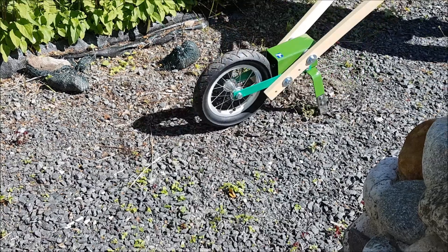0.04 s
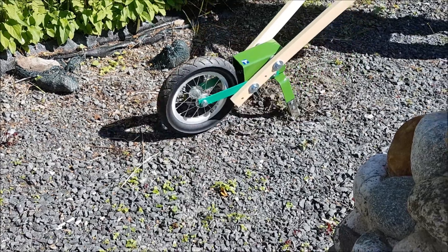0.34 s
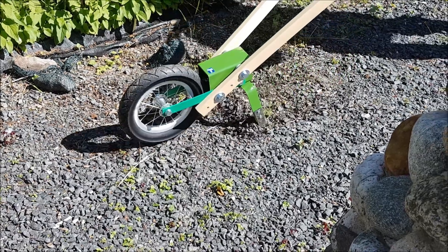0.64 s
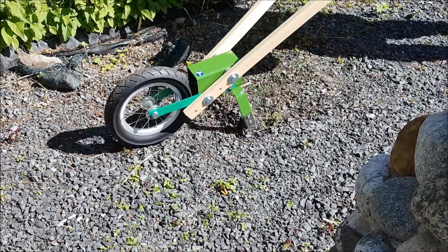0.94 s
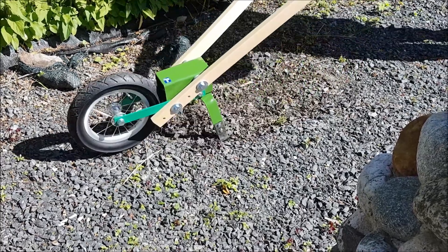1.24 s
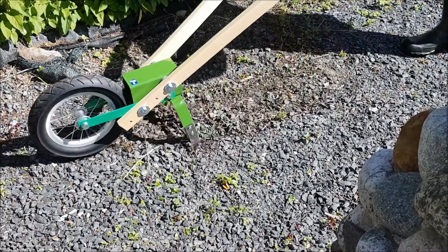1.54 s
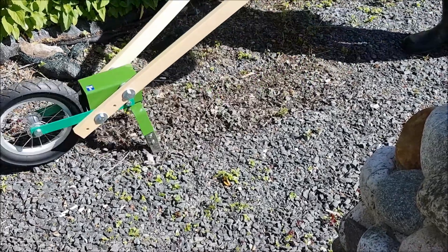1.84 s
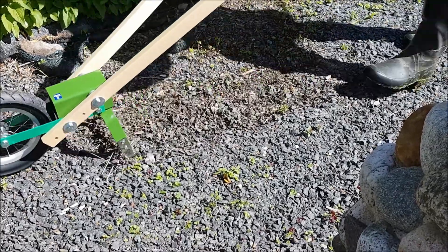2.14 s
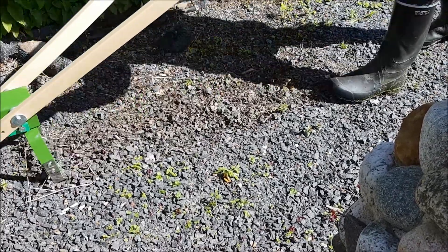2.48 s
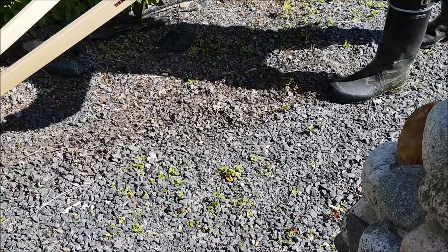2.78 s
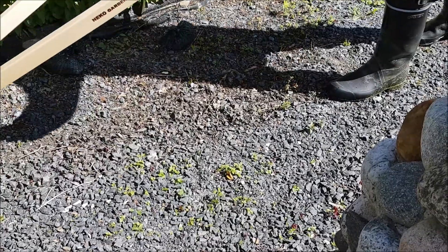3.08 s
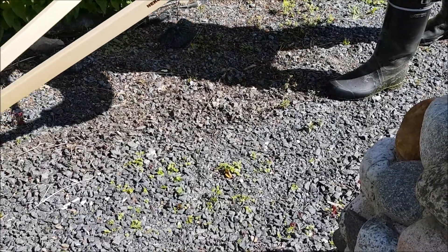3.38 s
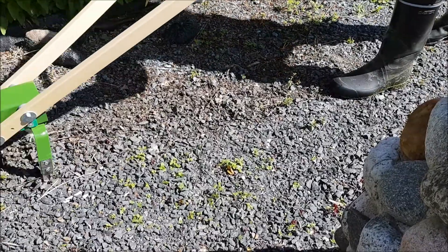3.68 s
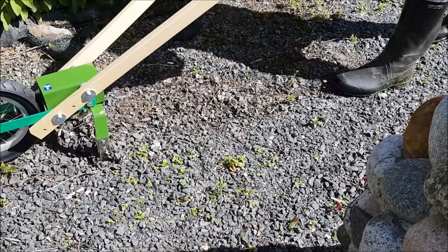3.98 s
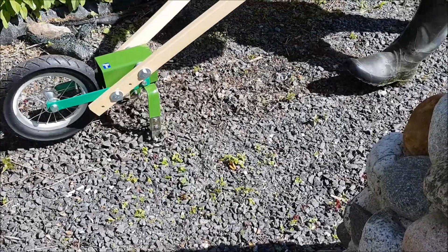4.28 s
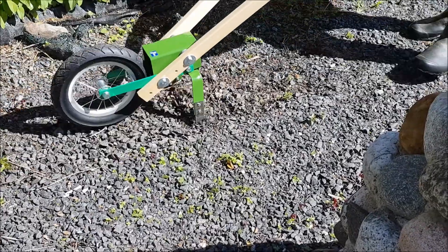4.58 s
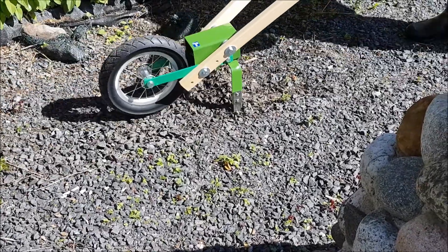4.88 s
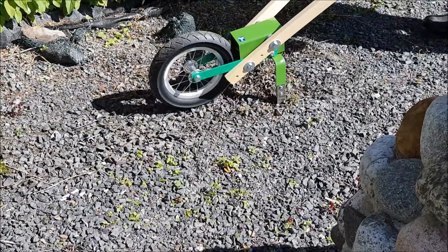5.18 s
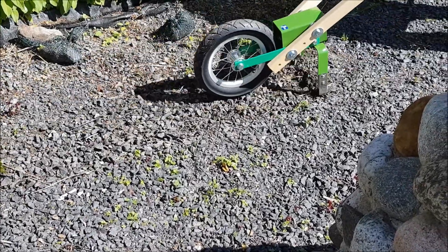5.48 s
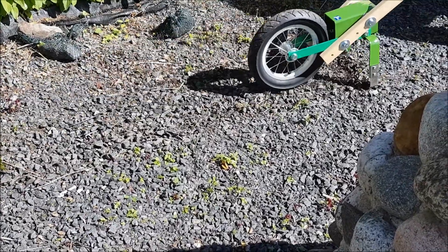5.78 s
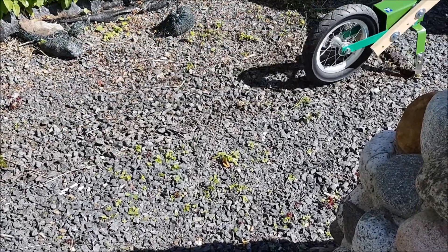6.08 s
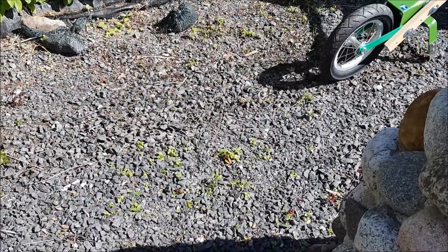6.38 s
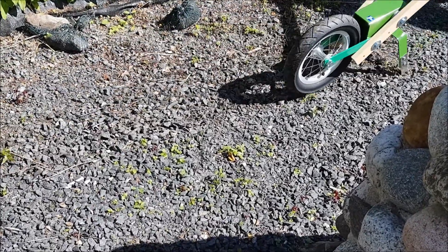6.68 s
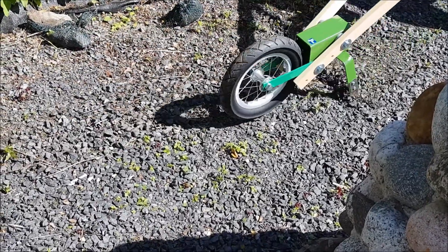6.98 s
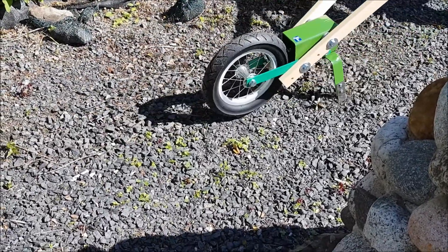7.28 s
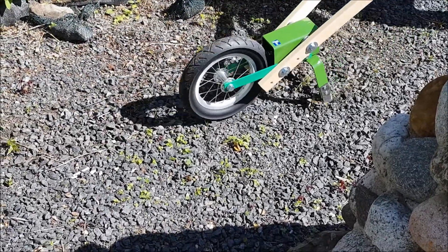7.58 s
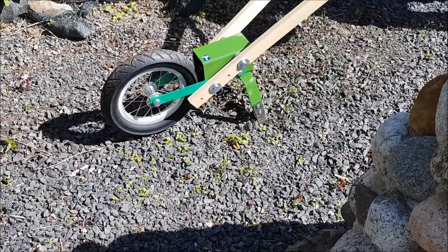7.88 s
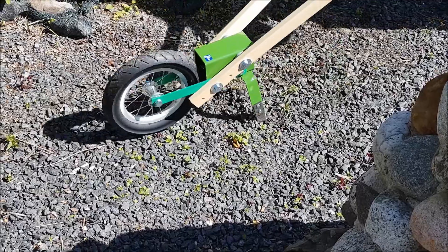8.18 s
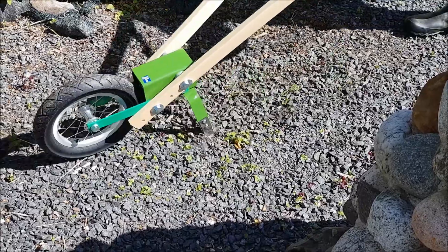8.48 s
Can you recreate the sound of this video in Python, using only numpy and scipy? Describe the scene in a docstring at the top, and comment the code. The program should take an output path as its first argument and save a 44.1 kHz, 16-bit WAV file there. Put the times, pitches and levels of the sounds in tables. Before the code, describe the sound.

Close outdoors, a steel hoe blade works back and forth through gravel, with gritty crunching, ringing stone clicks and dull knocks.

```python
"""A wheel hoe on a gravel path, outdoors, close to a stereo pair of microphones. It starts with short pushes,
as a faint hum fades and a bird chirps far off. Stones crunch together and strike the steel blade, which rings
through the frame; some jam and jump free, and the frame knocks dully. Then comes one long drag back, late in
which the tyre rubs with a low tone, brief squeals follow, and the blade skims loose pebbles. Near 6.6 s the hoe
turns round with a soft swish and is pushed again."""
import sys
import numpy as np
from scipy import signal
from scipy.fft import rfft, irfft, next_fast_len
from scipy.io import wavfile

SR = 44100
rng = np.random.default_rng(int(sys.argv[2]) if len(sys.argv) > 2 else 0)


def wav_out(sig):
    """Save sig, one row per channel (or a flat mono array), as 16-bit PCM at SR to the path in sys.argv[1]."""
    wavfile.write(sys.argv[1], SR, np.round(np.clip(np.atleast_2d(sig).T, -1, 1) * 32767).astype(np.int16))


N = 376613
T = np.arange(N) / SR


# Colour of the colliding stones, per third octave: f/Hz, level/dB (all table levels are relative)
STONE_SPECTRUM = [(80, -34), (170, -24.5), (300, -7), (550, -14), (1000, -6.5), (1700, -10), (2700, -7.5),
                  (4000, -2.5), (5500, -9), (7500, 0), (9500, -10), (13000, 3.5), (16000, -3.5)]

def gravel(clicks, drag, level_db, mix_db):
    """Stone on stone, close up: dry clicks that die within a few cycles, in an ever-changing mix of sizes."""
    out = 0
    for hz in np.geomspace(80, 15000, 24):
        strength = effort(drag, hz) * from_db(level_db + at_hz(STONE_SPECTRUM, hz) + mix_db * drift(45))
        out = out + third_octave(scatter(clicks * strength, hz), hz)
    return out


def collisions(per_s, size_db, clump_db):
    """Stone contacts, many small and a few large, in clumps as the gravel sticks and slips; unit power."""
    sizes = from_db(size_db * np.minimum(rng.exponential(1, N), 4))
    hits = rng.random(N) < per_s / SR
    return rms_one(hits * sizes * from_db(clump_db * drift(110)) / np.sqrt(per_s))


# Modes of blade, frame and wheel: f/Hz, width/Hz, level/dB
STEEL_MODES = [(290, 59, -7), (367, 27.5, 2), (433, 43, -2.5), (718, 47, -2), (919, 59, 1), (1092, 58, 0),
               (1130, 13, -21), (1458, 160, 1), (1656, 63, 0.5), (1848, 36, -10), (2254, 230, 3.5),
               (2325, 480, 2), (2570, 105, 1), (2755, 105, 0), (2900, 69, -8.5), (3026, 94, 1),
               (3343, 125, 3.5), (3600, 170, -14.5), (4210, 200, 0), (4425, 260, -2.5), (5060, 160, -8),
               (6700, 1100, 2), (7850, 430, 3), (11800, 350, -33), (12900, 290, -15), (15800, 300, -24)]

def hoe(clicks, drag, level_db, shift_db):
    """Stone on steel: as the contacts move along the blade, now one mode rings out and now another."""
    out = 0
    for hz, width, db in STEEL_MODES:
        strength = effort(drag, hz) * from_db(level_db + db + shift_db * drift(22))
        out = out + resonate(scatter(clicks * strength, hz), hz, width)
    return out


# The blade takes hold of the path: bite t/s, ease t/s, attack/s, release/s, bite level/dB, ease level/dB,
# weight on the frame against crunch/dB, fine grit against crunch/dB
BLADE_STROKES = [(0, 0.009, 0.0089, 0.071, -46, -44, 0, -8),
                 (0.356, 0.548, 0.0074, .1, -46, -54.5, -5, -6.5),
                 (0.605, 0.699, 0.086, 0.15, -39, -44.5, -5, -6),
                 (0.799, 0.898, .03, 0.097, -61, -64, 7.5, -3),
                 (1.048, 1.208, 0.056, 0.16, -43, -36.5, -2.5, -6.5),
                 (1.554, 1.69, 0.015, 0.12, -51, -39.5, -0.5, -7),
                 (1.796, 1.809, .1, 0.051, -32, -33.5, -17, -5),
                 (1.865, 1.923, .03, 0.12, -51, -49.5, -1, -2.5),
                 (2.141, 2.297, 0.081, 0.092, -46.5, -41, -5, -7.5),
                 (2.392, 2.989, 0.13, .06, -39.5, -37, -6, -3),
                 (3.023, 3.126, 0.027, .045, -38.5, -45.5, -8.5, -7.5),
                 (3.4, 3.64, 0.13, 0.17, -40, -40.5, -9.5, -6),
                 (3.75, 4.055, 0.12, 0.1, -42, -43.5, -4, -3),
                 (4.146, 4.203, .08, 0.077, -40, -39.5, -3, -1.5),
                 (4.276, 4.641, 0.14, 0.26, -44.5, -45, -4.5, -3),
                 (4.76, 5.246, 0.22, 0.19, -48.5, -43, -2.5, -5),
                 (5.535, 5.704, 0.2, 0.24, -46.5, -46, -3.5, -4.5),
                 (5.822, 6.09, .015, 0.28, -44, -48, -4.5, -1),
                 (6.294, 6.422, .05, .2, -62, -68.5, 0.5, -1),
                 (6.688, 6.846, 0.017, 0.057, -57, -58.5, 2, 2),
                 (6.896, 7.063, 0.14, .13, -40, -39.5, -4.5, -4),
                 (7.155, 7.21, 0.054, 0.1, -39, -37.5, -7, -7),
                 (7.639, 7.713, 0.069, 0.19, -48.5, -50, 1, -12.5),
                 (7.755, 7.966, 0.052, 0.16, -40, -39.5, -5, -3.5),
                 (8.39, 8.537, 0.057, .1, -38, -41, -2.5, -2)]
# The wheel alone: crunch level/dB, weight level/dB, grit level/dB
WHEEL_LEVELS = [-70, -63, -71]

def strokes(ramp_db=20, release_curve=1.28):
    """Each stroke bites, holds and lets go over the rolling wheel; power of crunch, weight and grit."""
    power = from_db(WHEEL_LEVELS)[:, None] ** 2
    for bite, ease, attack_s, release_s, bite_db, ease_db, weight_db, grit_db in BLADE_STROKES:
        attack = np.maximum(bite - T, 0) / attack_s
        release = (np.maximum(T - ease, 0) / release_s) ** release_curve   # gentle, then a clean stop
        held_db = np.interp(T, [bite, ease], [bite_db, ease_db])
        crunch_db = held_db - ramp_db * np.minimum(attack + release, 10)
        power = power + np.outer(from_db([0, weight_db, grit_db]), from_db(crunch_db)) ** 2
    return power


def dragging(lurch_per_s=22, lurch_db=1.31, rocking_db=2.4):
    """Gains of crunch, weight and grit: uneven ground sways the whole drag, and the frame rocks on top."""
    slip_db = jamming(hold_db=-2.5, hold_s=0.018, surge_db=0.6, surge_s=0.0056)
    slip_db += lurch_db * drift(lurch_per_s)
    crunch, weight, grit = np.sqrt(strokes() * from_db(slip_db) ** 2 + spills())
    return crunch, weight * from_db(rocking_db * drift(lurch_per_s)), grit


# Crossover corners, weight to crunch and crunch to grit: f/Hz
CROSSOVERS = [700, 1900, 4000, 6500]

def effort(drag, hz):
    """The drag's gain at a pitch: weight drives the lows, crunch the middle and grit the treble."""
    crunch, weight, grit = drag
    low = np.interp(np.log(hz), np.log(CROSSOVERS), [1, 0, 0, 0])
    high = np.interp(np.log(hz), np.log(CROSSOVERS), [0, 0, 0, 1])
    return low * weight + high * grit + (1 - low - high) * crunch


def pebbles(drag, level_db, size_db, ring_s, count):
    """Loose pebbles clink, each once and at a pitch of its own; higher ones die sooner."""
    when, pitch, luck, pan = rng.random((count, 4)).T
    t = T[:SR // 25]
    at = (when * (N - len(t))).astype(int)
    hz = 1000 * 15 ** pitch
    size = np.minimum(-np.log(luck), 3)
    push = effort([gain[at] for gain in drag], hz)
    gain = push * from_db(level_db + at_hz(STONE_SPECTRUM, hz) + size_db * size)
    decay_s = ring_s * np.sqrt(4000 / hz)
    clinks = gain[:, None] * np.sin(2 * np.pi * hz[:, None] * t) * np.exp(-t / decay_s[:, None])
    samples = (at[:, None] + np.arange(len(t))).ravel()
    return np.array([np.bincount(samples, (clinks * share[:, None]).ravel(), N)
                     for share in (.5 + pan, 1.5 - pan)])


def skimming(drag, start_s, end_s, boost_db):
    """Late in the pull the blade rides on top and flicks loose pebbles harder."""
    return np.array(drag) * from_db(boost_db * ((T > start_s) & (T < end_s)))


# Stones that jam and jump free: t/s, rattle level/dB, f/Hz, crack level/dB
JAMMED_STONES = [(0.351, -31, 900, -61), (0.396, -25.5, 2750, -49), (0.603, -25, 2540, -46),
                 (0.678, -26, 2640, -47), (1.015, -29, 1450, -55), (1.037, -22.5, 2570, -52),
                 (1.065, -21, 2640, -45.5), (1.173, -20, 2600, -34), (1.56, -30, 2640, -56),
                 (1.687, -18, 2750, -32), (1.693, -24, 2640, -43), (1.771, -27, 2570, -24.5),
                 (1.787, -19, 2530, -37), (1.794, -14.5, 3220, -35), (1.802, -20, 2530, -42),
                 (1.82, -22, 2650, -28), (2.171, -20, 2680, -29), (2.236, -20.5, 2510, -22),
                 (2.39, -16.5, 2900, -26.5), (2.43, -14, 2810, -24), (2.528, -29, 1130, -41),
                 (2.686, -23, 1130, -31), (2.918, -20, 6900, -33), (2.969, -12, 2350, -24),
                 (3.123, -24.5, 1730, -58), (3.48, -17.5, 930, -34), (3.519, -27.5, 915, -27.5),
                 (3.627, -19, 1113, -27), (3.675, -20.5, 960, -29), (3.741, -24.5, 950, -35),
                 (4.028, -25.5, 2320, -43), (4.137, -23, 2380, -35), (4.166, -21.5, 1843, -38),
                 (4.207, -16.5, 2404, -38), (4.466, -24, 2970, -46), (4.614, -23, 2640, -30),
                 (5.065, -22.5, 2680, -50), (5.143, -25, 1100, -33.5), (5.214, -17, 2730, -39),
                 (5.51, -35, 1680, -32), (5.707, -24, 3320, -27.5), (5.826, -30.5, 4980, -41),
                 (5.872, -24, 2900, -30.5), (6.039, -28, 3890, -36), (6.692, -38, 4090, -33.5),
                 (6.79, -39, 7940, -32.5), (6.903, -21, 6600, -25), (6.95, -14.5, 7580, -26),
                 (7.03, -20.5, 1664, -44), (7.42, -35, 947, -54), (7.642, -21, 1626, -39),
                 (7.756, -19.5, 2680, -40), (7.842, -18, 3330, -41), (8.098, -33, 3320, -38.5),
                 (8.153, -33, 1503, -58), (8.211, -32, 1476, -58), (8.334, -35.5, 1680, -52),
                 (8.364, -25.5, 3370, -44), (8.386, -19, 2190, -34), (8.489, -17.5, 3390, -30)]

def jolts(ring_db, crack_db, rattle_s, crack_s, damping, dull_db):
    """A jammed stone cracks free, then rattles briefly against the blade at its own pitch."""
    out = np.zeros((2, N + SR))
    for s, db, hz, bright_db in JAMMED_STONES:
        clicks = chatter(2500, rattle_s * np.sqrt(2500 / hz), hz)
        ring = resonate(clicks, hz, hz * damping)
        body = from_db(dull_db) * resonate(clicks, hz * 0.26, hz * 0.13)
        rattle = from_db(db + ring_db) * rms_one(ring + body)
        snap = resonate(chatter(11000, crack_s, 11500), 5330, 9300)
        crack = from_db(bright_db + crack_db) * rms_one(snap)
        at = round(s * SR)
        out[:, at:at + clicks.shape[1]] += rattle + crack
    return out[:, :N]


def chatter(per_s, decay_s, hz):
    """A dying run of quick touches, spread as wide as stones of pitch hz."""
    t = T[:SR // 8]
    touches = (rng.random(len(t)) < per_s / SR) | (t == 0)
    mid, side = touches * rng.choice([-1, 1], (2, len(t))) * np.exp(-t / decay_s)
    return stereo(mid, side, at_hz(STONE_WIDTH, hz))


def jamming(hold_db, hold_s, surge_db, surge_s):
    """The gravel stalls while a stone jams, then surges as it lets go; in dB."""
    out, t = np.zeros(N + SR), T[:SR // 10]
    shape = np.r_[hold_db * np.exp(-t[::-1] / hold_s), surge_db * np.exp(-t / surge_s)]
    for s, *_ in JAMMED_STONES:
        at = round(s * SR)
        out[at:at + len(shape)] += shape
    return out[len(t):len(t) + N]


def spills(rise_s=0.0044, fall_s=.014, crunch_db=-20, weight_db=-21.5, grit_db=-13, shake_db=-10):
    """Every jolt sheds a run of stones and every knock shakes the frame; power of crunch, weight, grit."""
    power, t = np.zeros((3, N + SR)), T[:SR // 5]
    shape = np.r_[np.exp(-t[::-1] / rise_s), np.exp(-t / fall_s)]
    bursts = [(s, from_db([db + crunch_db, db + weight_db, bright_db + grit_db]))
              for s, db, _, bright_db in JAMMED_STONES]
    bursts += [(s, [0, from_db(db + shake_db), 0]) for s, db in FRAME_KNOCKS]
    for s, gains in bursts:
        at = round(s * SR)
        power[:, at:at + len(shape)] += np.outer(gains, shape) ** 2
    return power[:, len(t):len(t) + N]


# Dull knocks of the frame: t/s, level/dB
FRAME_KNOCKS = [(.259, -43.5), (.748, -31.5), (1.807, -40), (4.619, -29), (4.913, -29.5), (4.936, -31),
                (4.968, -32), (6.033, -37.5), (6.145, -38), (6.744, -36.5), (7.452, -42), (7.592, -40),
                (8.514, -24.5)]
# What a knock rings with: f/Hz, width/Hz, level/dB
FRAME_MODES = [(180, 70, -36), (338, 200, 13), (450, 86, 3.5), (620, 160, -21)]

def knocks(level_db, soft_hz):
    """Soft, heavy contacts wake only the frame's low modes."""
    clicks = np.zeros(N)
    for s, db in FRAME_KNOCKS:
        clicks[round(s * SR)] = from_db(db + level_db)
    thuds = signal.sosfilt(signal.butter(2, soft_hz, fs=SR, output="sos"), clicks + 1e-18)
    return sum(from_db(db) * resonate(thuds, hz, width) for hz, width, db in FRAME_MODES)


# The tyre rubs with a low tone, joined by brief higher squeals: start t/s, end t/s, f/Hz, level/dB,
# unsteadiness/dB
RUB_SQUEALS = [(5.305, 5.444, 365.5, -45.5, 1), (5.35, 5.425, 1494, -50, 2), (5.472, 5.62, 1678, -53, 5)]

def squeals(waver):
    """Friction locks onto one mode for a moment and gives an unsteady tone."""
    out = np.zeros(N)
    bend, grip = 1 + waver * drift(70), drift(90)
    for start, end, hz, db, unsteady_db in RUB_SQUEALS:
        progress = np.clip((T - start) / (end - start), 0, 1)
        swell = np.sqrt(np.sin(np.pi * progress).clip(0))
        out += from_db(db + unsteady_db * grip) * swell * np.sin(2 * np.pi * np.cumsum(hz * bend) / SR)
    return out


# The hoe turns round: centre t/s, half-length/s, level/dB
TURNING_RUBS = [(6.637, 0.15, -52)]

def rub(hz, width_hz):
    """A soft rubbing swish that swells and fades."""
    friction = scatter(rng.standard_normal(N), hz)
    swish = resonate(resonate(friction, hz, width_hz), hz, width_hz)
    return rms_one(swish) * swells(TURNING_RUBS)


# Stones fly to both sides of the microphones, small bright ones furthest: f/Hz, side against mid/dB
STONE_WIDTH = [(80, -29), (300, -34), (600, -7), (1100, -14.5), (2200, -7), (4200, -5), (7000, -7.5),
               (10000, 2.5), (15000, -13)]

def scatter(clicks, hz):
    """The same contacts with new strengths, signs and directions: each hits every mode differently."""
    at, out = np.flatnonzero(clicks), np.zeros((2, N))
    mid, side = rng.uniform(-1, 1, (2, N))[:, at] * np.sqrt(3)
    out[:, at] = clicks[at] * stereo(mid, side, at_hz(STONE_WIDTH, hz))
    return out


# Where the blade is in front of the pair: t/s, lead of the left microphone/ms
BLADE_PATH = [(0, -0.078), (1.4, -0.038), (2.6, .16), (3.5, 0.23), (4.3, 0.067), (5.4, 0.0097),
              (5.9, -0.19), (7.1, -.15), (8.5, 0.012)]

def placed(x, bass_share):
    """The nearer microphone leads: most in the upper mids, less in the bass, not at all in the treble."""
    lead_ms = np.interp(T, *np.transpose(BLADE_PATH))
    shift_s = lead_ms / 2000   # half the lead to each side
    bass, below_treble = (signal.sosfiltfilt(signal.butter(24, hz, fs=SR, output="sos"), x)
                          for hz in (1300, 4500))
    out = x - below_treble
    for part, share in ((bass, bass_share), (below_treble - bass, 1)):
        out = out + [np.interp(T + side * share * shift_s, T, mic) for side, mic in zip((1, -1), part)]
    return out


def yard(x, t60, wet_db, low_hz, high_hz):
    """Ground, rocks and hedge scatter a short, dull tail, different at each microphone."""
    t = T[:SR // 4]
    tails = rng.standard_normal((2, len(t))) * from_db(-60 * t / t60) * (t > .001)
    tails /= np.sqrt(np.sum(tails ** 2, axis=1, keepdims=True))
    wet = signal.fftconvolve(x, tails, axes=1)[:, :N]
    return from_db(wet_db) * bandpass(wet, low_hz, high_hz, order=1)


# Balance of the hoe across the pair: f/Hz, left minus right/dB
PAIR_BALANCE = [(60, 29), (99, -10), (160, 1.5), (270, 1.5), (450, -1), (740, 0), (1220, -1.5), (2010, -2),
                (3330, -2.0), (5500, -2.5), (9080, 1), (15000, 1.5)]

def balanced(x):
    """Each band leans a little to one microphone; the deepest bass leans far left."""
    return colour(x, PAIR_BALANCE, share=np.array([[.5], [-.5]]))


# A bird, far off: t/s, length/s, first f/Hz, last f/Hz, level/dB
BIRD_CHIRPS = [(0.228, .025, 3800, 3100, -66), (0.308, .022, 4000, 3150, -60),
               (3.197, .025, 3580, 3000, -66)]

def bird():
    """Short whistles that slide down."""
    out = np.zeros(N)
    for s, length, first_hz, last_hz, db in BIRD_CHIRPS:
        hz, at = np.linspace(first_hz, last_hz, int(length * SR)), round(s * SR)
        whistle = np.sin(2 * np.pi * np.cumsum(hz) / SR)
        out[at:at + len(hz)] += from_db(db) * np.hanning(len(hz)) * whistle
    return out


# Soft low rumbles: centre t/s, half-length/s, level/dB
LOW_RUMBLES = [(0.028, .06, -65), (3.418, 0.1, -66), (3.893, 0.065, -61), (5.735, .1, -67),
               (8.48, 0.12, -76)]

def rumbles(top_hz):
    """Brief swells of deep noise, different at each microphone."""
    return swells(LOW_RUMBLES) * rms_one(bandpass(rng.standard_normal((2, N)), 30, top_hz))


def hum(hz, db, fade_s):
    """A faint far hum that dies away early on."""
    return from_db(db) * np.exp(-(T / fade_s) ** 2) * np.sin(2 * np.pi * hz * T)


# Noise density of the open air around the path: f/Hz, level/dB
AIR_SPECTRUM = [(12, -40), (30, -15), (60, -21), (120, -3), (195, -19.5), (260, -17), (360, -1.5),
                (550, -1.5), (1000, -6), (2500, -16.5), (6000, -25), (16000, -21)]

def air(level_db, side_db):
    """Quiet outdoor background, wide and steady."""
    mid, side = colour(rng.standard_normal((2, N)), AIR_SPECTRUM)
    return from_db(level_db) * rms_one(stereo(mid, side, side_db))


def from_db(db):
    """Decibels to gain."""
    return 10 ** (np.asarray(db) / 20)


def rms_one(x):
    """Scale to unit power."""
    return x / np.sqrt(np.mean(x ** 2) + 1e-20)


def stereo(mid, side, side_db):
    """Mid and side to left and right."""
    return mid + from_db(side_db) * side * [[1], [-1]]


def swells(rows):
    """A sum of bell-shaped envelopes."""
    return sum(from_db(db) * np.exp(-((T - s) / half_s) ** 2) for s, half_s, db in rows)


def drift(rate):
    """A random wander with spread 1 that turns about rate times a second."""
    knots = rng.standard_normal(8192)
    return rms_one(np.interp(T * rate, np.arange(len(knots)), knots))


def at_hz(points, hz):
    """Read a spectrum on a log-frequency axis."""
    f, value = np.transpose(points)
    return np.interp(np.log(hz + 1e-3), np.log(f + 1e-3), value)


def colour(x, points, share=1):
    """Give a signal the gains of a spectrum."""
    size = next_fast_len(N)
    gains = from_db(share * at_hz(points, np.fft.rfftfreq(size, 1 / SR)))
    return irfft(rfft(x, size) * gains, size)[..., :N]


def resonate(x, hz, width_hz):
    """A two-pole resonance; a unit click leaves it with unit energy."""
    r = np.exp(-np.pi * width_hz / SR)
    feedback = [1, -(1 + r * r) * np.cos(2 * np.pi * hz / SR), r * r]
    return signal.lfilter(np.sqrt((1 - r * r) / 2) * np.array([1, 0, -1]), feedback, x + 1e-18)


def bandpass(x, low_hz, high_hz, order=2):
    """Keep what lies between two frequencies."""
    return signal.sosfilt(signal.butter(order, [low_hz, high_hz], "band", fs=SR, output="sos"), x + 1e-18)


def third_octave(x, hz):
    """A third-octave band; a unit click leaves it with about unit energy."""
    low, high = hz * 2 ** (-1 / 6), hz * 2 ** (1 / 6)
    return bandpass(x, low, high) * np.sqrt(SR / 2 / (high - low))


def scene():
    """The hoe close by, the garden behind it; the harder the drag, the more stones collide each second."""
    drag = dragging()
    crunch = drag[0]
    per_s = 3000 + 7000 * (crunch / crunch.max()) ** .7
    clicks = collisions(per_s, size_db=0.5, clump_db=1.43)
    tool = gravel(clicks, drag, level_db=-5.5, mix_db=2.0)
    tool += hoe(clicks, drag, level_db=-10.5, shift_db=3.0)
    skim = skimming(drag, start_s=5.45, end_s=6.9, boost_db=2)
    tool += pebbles(skim, level_db=-8.0, size_db=4.5, ring_s=0.013, count=1600)
    tool += jolts(ring_db=-26.0, crack_db=-25.5, rattle_s=0.006, crack_s=0.004,
                  damping=0.026, dull_db=-24.5)
    tool += knocks(level_db=0.5, soft_hz=1210) + squeals(waver=0.0125) + rub(hz=2370, width_hz=1860)
    close = placed(tool, bass_share=0.42) + yard(tool, t60=0.056, wet_db=-7.0, low_hz=630, high_hz=5200)
    garden = air(level_db=-61, side_db=-0.5) + bird() + rumbles(top_hz=93)
    garden += hum(hz=179, db=-67, fade_s=0.76)
    return balanced(close) + garden


def record(dry):
    """Both channels are cut steeply above 15750 Hz."""
    return signal.sosfilt(signal.ellip(12, .1, 80, 15750, fs=SR, output="sos"), dry)


dry = scene()
out = record(dry)
wav_out(out)
```